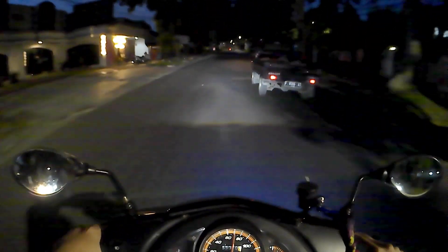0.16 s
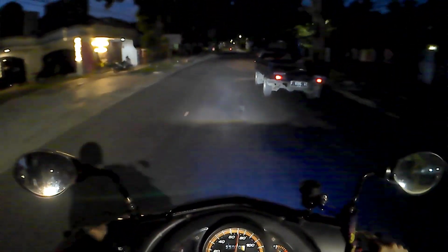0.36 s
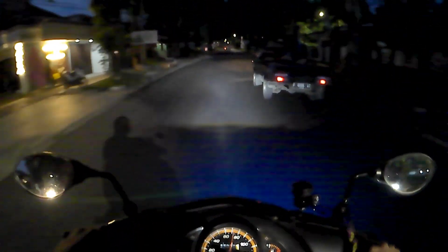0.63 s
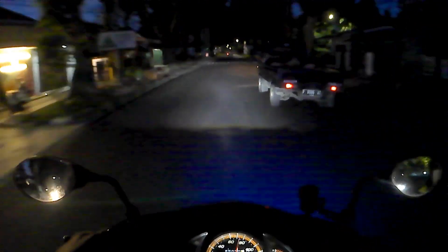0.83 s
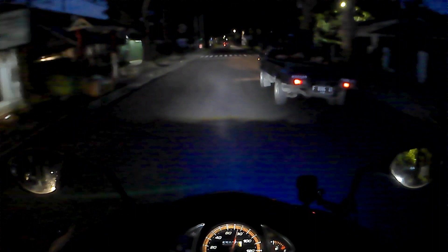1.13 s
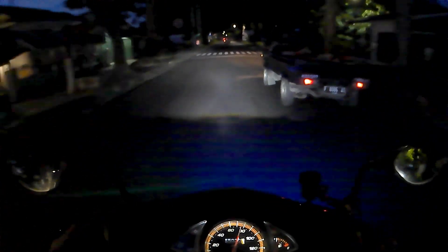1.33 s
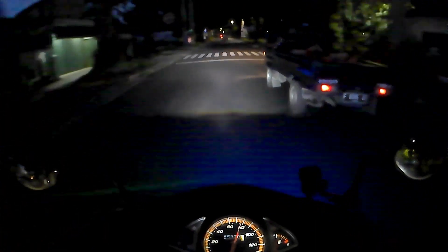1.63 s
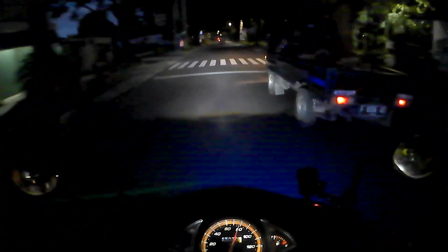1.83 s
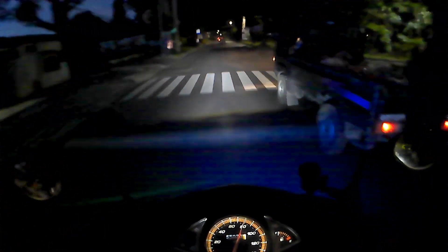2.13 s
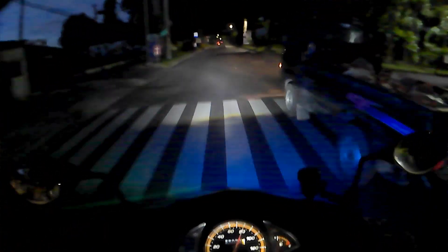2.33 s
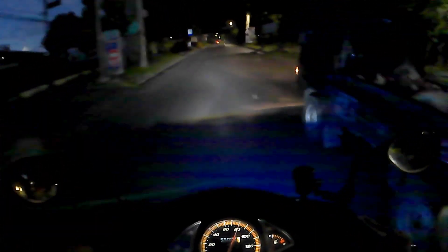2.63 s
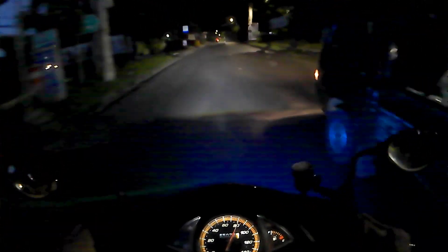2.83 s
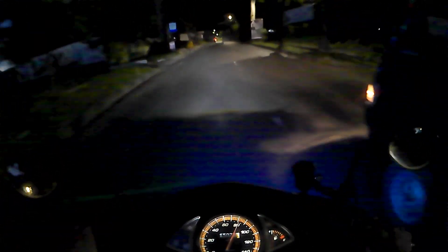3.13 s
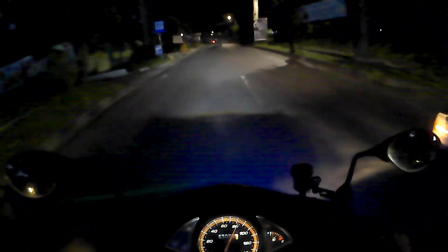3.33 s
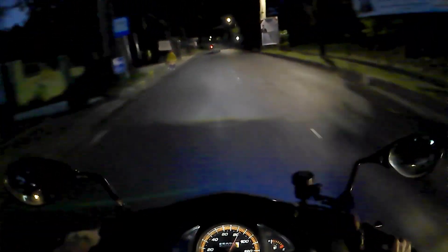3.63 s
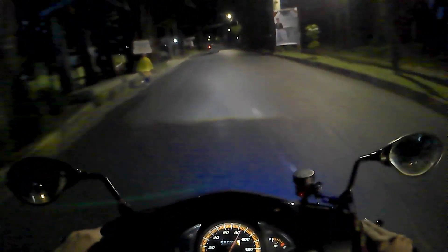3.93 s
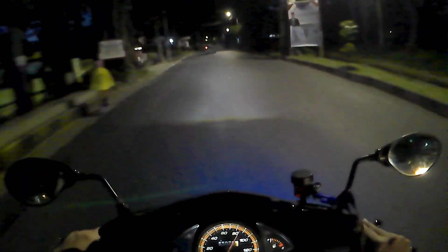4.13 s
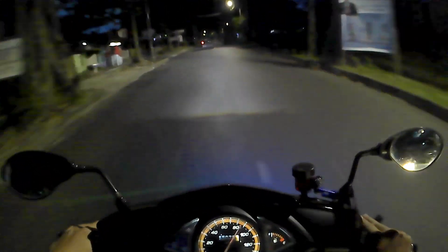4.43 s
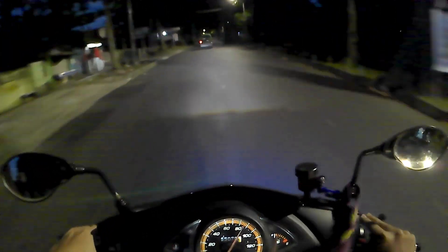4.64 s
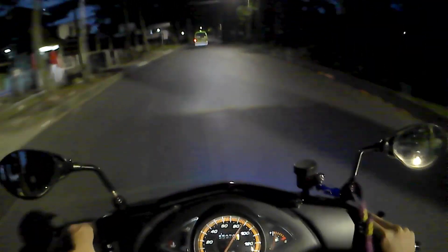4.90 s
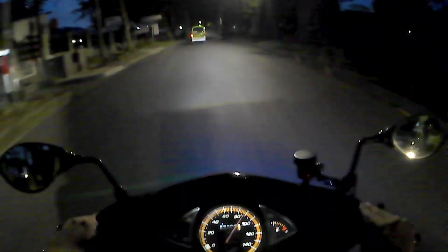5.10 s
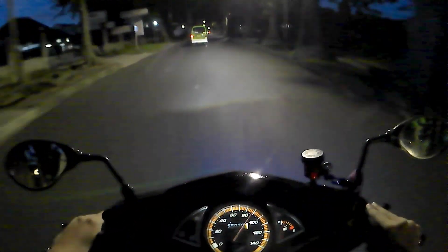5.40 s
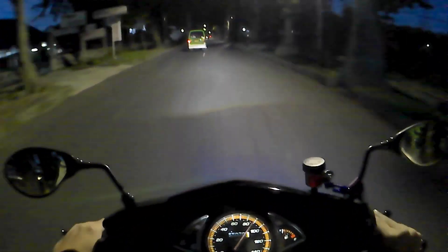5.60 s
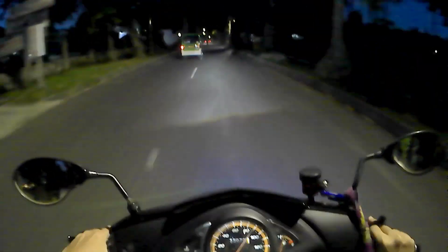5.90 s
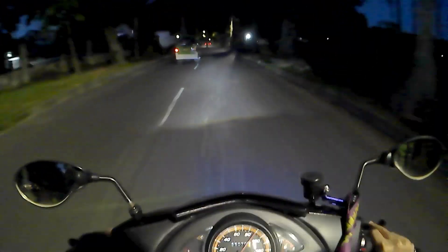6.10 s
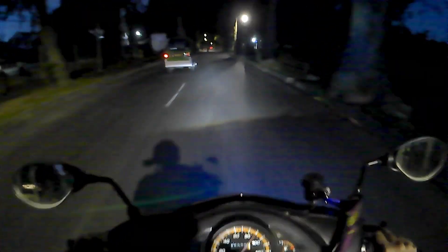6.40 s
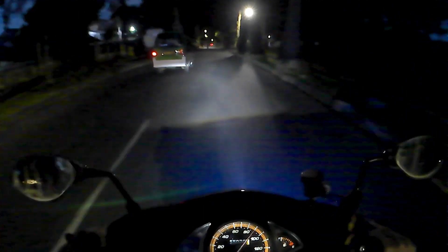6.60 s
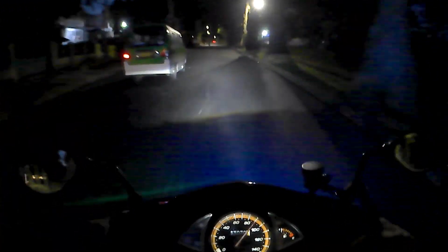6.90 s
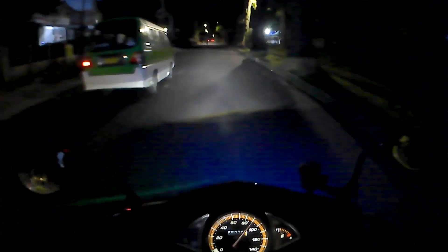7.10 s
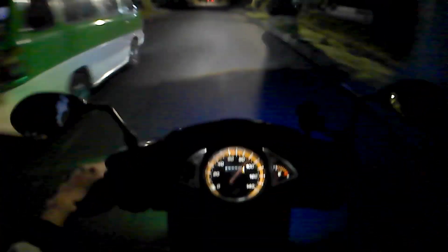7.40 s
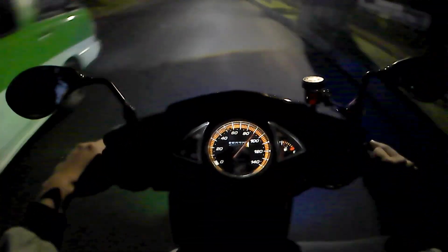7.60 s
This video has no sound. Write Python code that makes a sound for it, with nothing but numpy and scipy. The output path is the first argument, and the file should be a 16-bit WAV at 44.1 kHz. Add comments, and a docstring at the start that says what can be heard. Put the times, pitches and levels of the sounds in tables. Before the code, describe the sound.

Heard from the rider's seat, a small single-cylinder scooter runs continuously at high, nearly steady revs, a raspy buzzing drone. Low wind rumbles and thumps against the microphone in short irregular gusts. Around three seconds a truck is passed and the airy hiss swells for about a second, then settles. The sound is close, outdoors, mono, slightly ringing and compressed, with dull treble.

```python
"""Scooter ride at night

A small single-cylinder scooter runs at nearly steady high revs along a road, heard from the rider's seat.
Each firing sends one pulse through the exhaust, built from multiples of the firing rate.
Filtered noise makes the rest: intake and tyre hiss puffs in step with the engine and swells while a car
is overtaken, and wind buffets the microphone in gusts with a brighter edge."""
import sys
import numpy as np
from scipy import signal
from scipy.fft import rfft, irfft
from scipy.io import wavfile

SR = 44100
rng = np.random.default_rng(int(sys.argv[2]) if len(sys.argv) > 2 else 0)


def voltage_ratio(decibels):
    """Convert decibels (scalar or array-like) to amplitude ratios, 20 dB per decade."""
    exponent = np.asarray(decibels, float) / 20
    return 10 ** exponent


def wrap_up_sound(samples):
    """Save the sound to the file named by the first command line argument, as 16-bit audio."""
    columns = np.atleast_2d(samples).T
    # keep every value between -1 and 1, then stretch to whole-number steps
    tamed = np.clip(columns, -1, 1)
    steps = np.round(tamed * 32767).astype(np.int16)
    wavfile.write(sys.argv[1], SR, steps)


N = 341775   # length in samples
CYCLE = 1024   # points in the stored wave of one firing


def rms_one(x):
    """Scales a signal to an rms (average strength) of 1."""
    return x / np.sqrt(np.mean(x ** 2) + 1e-20)


def in_time(rows):
    """Draws straight lines between table rows; gives each column after the time, sample by sample."""
    seconds, *columns = np.transpose(rows)
    return [np.interp(np.arange(N) / SR, seconds, column) for column in columns]


def drift(rate):
    """Slow random wandering of rms 1 that changes about rate times a second."""
    hop = 40   # samples between the points of the slow noise
    settle = 2000   # points thrown away while the filter settles
    pole = np.exp(-2 * np.pi * rate * hop / SR)
    noise = rng.standard_normal(N // hop + 2 + settle)
    slow = signal.lfilter([1], [1, -2 * pole, pole * pole], noise)[settle:]
    return np.interp(np.arange(N) / hop, np.arange(len(slow)), rms_one(slow))


def coloured(spectrum):
    """Noise of rms 1, filtered to the given spectrum."""
    hz, level_db = np.transpose(spectrum)
    bins = np.fft.rfftfreq(N, 1 / SR) + 1e-3   # keeps the logarithm finite at 0 Hz
    shape_db = np.interp(np.log(bins), np.log(hz), level_db, right=-120)
    white = rng.standard_normal(N)
    return rms_one(irfft(rfft(white) * voltage_ratio(shape_db), N))


def firing_clock():
    """Counts firings by adding up the engine speed; firings come slightly early or late."""
    # Engine speed. Each row: time in seconds, firings per second.
    speed = [(0.0, 69.33), (0.25, 70.63), (0.5, 71.85), (1.0, 73.1), (1.2, 73.2), (2.3, 71.3),
             (2.75, 71.52), (3.25, 72.06), (4.0, 73.7), (4.25, 73.64), (4.75, 73.34), (5.25, 72.63),
             (6.0, 73.25), (6.25, 73.03), (6.7, 72.85), (7.3, 73.75), (7.75, 73.87)]
    return np.cumsum(in_time(speed)[0]) / SR + 0.0015 * drift(20)


def firing_shape():
    """Spectrum of one firing, with the minimum phase of a pulse that rings out through a pipe."""
    # Tone colour of the exhaust. Each row: multiple of the firing rate, relative level in dB.
    exhaust_orders = [(1, -10), (2, 1.5), (3, -1), (4, -6), (5, 2), (6, -14), (7, -1.5), (8, -8),
                      (9, -22.5), (10, -24.5), (11, -18.5), (12, -15.5), (13, -19), (14, -13.5),
                      (15, -17.5), (16, -37.5), (17, -26), (18, -26.5), (19, -18.5), (20, -26.5),
                      (21, -23.5), (22, -31), (23, -26.5), (24, -31), (25, -39.5), (26, -26), (27, -32),
                      (28, -25), (29, -29), (30, -36.5), (31, -34.5), (32, -43), (33, -34.5), (34, -36.5),
                      (35, -38.5), (36, -39.5), (37, -34), (38, -41.5), (39, -35), (40, -47.5), (41, -43),
                      (42, -39), (43, -41), (44, -39), (45, -40.5), (46, -43)]
    order, level_db = np.transpose(exhaust_orders)
    half = CYCLE // 2
    log_gain = np.log(voltage_ratio(np.interp(np.arange(half + 1), np.arange(1, len(order) + 1), level_db)))
    # Folding the cepstrum onto its first half puts the energy as early as possible.
    cepstrum = irfft(log_gain)
    cepstrum[1:half] *= 2
    cepstrum[half + 1:] = 0
    shape = np.exp(rfft(cepstrum))
    shape[0] = 0
    shape[len(order) + 1:] = 0
    return shape / np.sqrt(2 * np.sum(np.abs(shape) ** 2)) * CYCLE   # the wave gets rms 1


def exhaust(firings):
    """Repeats the pulse; throttle and rasp re-weight groups of orders, whose strengths also wander."""
    # Engine load. Each row: time in seconds, exhaust level in dB, throttle in dB, rasp in dB.
    load = [(0.0, -13, -12.5, 6), (0.35, -14.5, -6, 13), (0.95, -14.5, -2.5, 13), (1.3, -14, -1, 6),
            (2.3, -13.5, -2, 3.5), (3.0, -14.5, -0.5, -1), (3.25, -12.5, -4.5, -2), (3.5, -14, 1.5, -0.5),
            (5.0, -13.5, -1, 2), (6.5, -13.5, 0, -1.5), (7.75, -15, 1, -3)]
    # Groups of orders (multiples of the firing rate) that leave the engine by different paths.
    # Each row: first order, last order, lag in firing periods.
    order_groups = [(1, 2, .165), (3, 4, .085), (5, 5, .647), (6, 6, .647), (7, 8, .647), (9, 12, .43),
                    (13, 13, .43), (14, 15, .43), (16, 19, .51), (20, 24, .51), (25, 29, .51),
                    (30, 46, .54)]
    # How each group responds. Each row: share of throttle, share of rasp, unevenness factor.
    group_traits = [(0.084, 0.16, 2), (0.24, 0.048, 0.7), (0.3, 0.034, 1.1), (0.35, 0.006, 1.1),
                    (0.6, -0.077, 0.81), (0.74, -.2, 1.5), (0.4, -1, 1.2), (0.8, 0.17, 2.3),
                    (0.94, 0.0, 1.8), (.5, 0.22, 2.5), (0.91, 0.02, 1.9), (0.63, 0.51, 2)]
    uneven_db = 0.53   # wandering of a group whose unevenness factor is 1
    level_db, throttle_db, rasp_db = in_time(load)
    shape = firing_shape()
    order = np.arange(CYCLE // 2 + 1)
    out = 0
    for (first, last, lag), (lift, raspy, uneven) in zip(order_groups, group_traits):
        in_group = (order >= first) * (order <= last)
        cycle = irfft(shape * in_group, CYCLE)
        position = (firings - lag) % 1 * CYCLE
        wave = np.interp(position, np.arange(CYCLE), cycle, period=CYCLE)
        gain_db = lift * throttle_db + raspy * rasp_db + uneven * uneven_db * drift(33)
        out = out + wave * voltage_ratio(gain_db)
    return voltage_ratio(level_db) * out


def puffs(firings, lag, depth_db):
    """A gain that swells once a firing, lag firing periods after the pulse, by depth_db either way."""
    return rms_one(voltage_ratio(depth_db * np.cos(2 * np.pi * (firings - lag))))


def alongside():
    """0 on the open road, 1 while the car is beside the rider."""
    start_s, rise_s, hold_s, fall_s = 2.99, 0.1, 0.7, 0.3
    corners = start_s + np.cumsum([0, rise_s, hold_s, fall_s])
    return np.interp(np.arange(N) / SR, corners, [0, 1, 1, 0])


def hiss(firings):
    """Air, tyre and valve noise puffs with each firing, the treble a little later; a passed car lifts it."""
    # Main part of the hiss. Each row: frequency in Hz, relative level per Hz in dB.
    body_spectrum = [(500, -4.5), (900, 4.5), (1250, 3.5), (1800, -0.5), (2500, -3.5), (3300, -8),
                     (4200, -13.5), (5500, -36)]
    # Upper part of the hiss. Each row: frequency in Hz, relative level per Hz in dB.
    treble_spectrum = [(2800, -19.5), (4000, 0.5), (5000, -1.5), (6000, -5), (7000, -11.5), (7400, -28)]
    car = alongside()
    level_db = -35 + 2.5 * car + 0.76 * drift(24)
    sag_db_per_s = 0.27   # the treble slowly fades
    treble_db = -14.5 - sag_db_per_s * np.arange(N) / SR + 3.5 * car   # on top of level_db
    body = coloured(body_spectrum) * puffs(firings, lag=0.62, depth_db=1.0)
    body = body * voltage_ratio(0.4 * drift(5.2))   # slight flicker
    treble = coloured(treble_spectrum) * puffs(firings, lag=0.79, depth_db=2.0)
    return voltage_ratio(level_db) * (body + treble * voltage_ratio(treble_db))


def gusts():
    """Every gust swells and fades as the same bell curve, in dB."""
    # Gusts; a negative rise is a dip. Each row: time of the middle in seconds, rise of the buffeting in dB,
    # rise of the bright edge in dB.
    gust_rows = [(0.08, 2.5, 6), (0.28, 0, 3), (0.551, 2.5, -1.5), (0.75, 4.5, 5), (1.13, 3.5, 3.5),
                 (1.54, -3, 1), (2.0, 10, 15), (2.16, 4.5, 5), (2.28, 3.5, 2), (2.54, 5, 7),
                 (2.781, 2.5, 4), (2.96, 6, 9.5), (3.13, 6.5, 10.5), (3.66, 5, 6.5), (3.88, 4.5, 5.5),
                 (4.101, 4, 4), (4.471, 5.5, 10), (4.679, 6.5, 0), (4.96, 4.5, 4), (5.22, 2, -5),
                 (5.431, 8, 9), (5.75, 5, 2), (6.03, 3.5, 1), (6.301, 7.5, 3), (6.749, 2, 4),
                 (7.02, 1.5, 8), (7.349, 2, 5), (7.639, 3.5, 9)]
    spread_s = 0.035   # standard deviation of the bell
    middle_s, *rises_db = np.transpose(gust_rows)
    steps = np.arange(0, N, 100) / SR
    bells = np.exp(-0.5 * ((steps[:, None] - middle_s) / spread_s) ** 2)
    return [np.interp(np.arange(N) / SR, steps, bells @ rise_db) for rise_db in rises_db]


def wind():
    """Low buffeting noise on the microphone, and the brighter edge that sharp gusts carry."""
    # Steady wind. Each row: time in seconds, buffeting level in dB.
    steady_wind = [(0.0, -20), (1.8, -23.5), (2.3, -20), (4.0, -20.5), (6.5, -19), (7.75, -16.5)]
    # Low rumble of the wind. Each row: frequency in Hz, relative level per Hz in dB.
    buffet_spectrum = [(20, -10.5), (38, -20.5), (60, -7.5), (100, -0.5), (250, -1), (370, -2), (470, -11),
                       (700, -23.5), (1200, -42)]
    # Brighter wind noise. Each row: frequency in Hz, relative level per Hz in dB.
    edge_spectrum = [(300, -27), (450, -11), (600, 1.5), (800, -5), (1000, -4), (1300, -19), (2000, -42)]
    buffet_rise_db, edge_rise_db = gusts()
    buffet_db = in_time(steady_wind)[0] + buffet_rise_db + 0.97 * drift(13)
    edge_db = -37 + edge_rise_db + 0.57 * drift(23)   # -37 dB between gusts
    return voltage_ratio(buffet_db) * coloured(buffet_spectrum) + voltage_ratio(edge_db) * coloured(edge_spectrum)


def ringing_bands(x):
    """Peak filters make evenly spaced narrow bands stand out, whatever sound passes."""
    # Boost of each band in dB, from 1.5 spacings upward, one spacing apart.
    band_lift_db = [5.65, 2.5, 4.7, 10.1, 7, 7, 7, 9, 8.9, 15]
    spacing_hz, width_hz = 689, 62
    damping = np.pi * width_hz / SR
    for k, lift_db in enumerate(band_lift_db):
        w = 2 * np.pi * (k + 1.5) * spacing_hz / SR
        gain = voltage_ratio(lift_db / 2)   # used above and below the line, so the peak gets the whole lift
        top = [1 + damping * gain, -2 * np.cos(w), 1 - damping * gain]
        bottom = [1 + damping / gain, -2 * np.cos(w), 1 - damping / gain]
        x = signal.lfilter(top, bottom, x)
    return x


def limiter(x, ceiling_db, release_db_per_s, attack_s):
    """Peaks over the ceiling pull the gain down; it recovers at a steady rate, smoothed by the attack."""
    ramp = release_db_per_s * np.arange(N) / SR
    over_db = np.maximum(20 * np.log10(np.abs(x) + 1e-9) - ceiling_db, 0)
    # With the ramp added, a running maximum falls back at the release rate.
    held_db = np.maximum.accumulate(over_db + ramp, axis=-1) - ramp
    pole = np.exp(-1 / (attack_s * SR))
    return x * voltage_ratio(-signal.lfilter([1 - pole], [1, -pole], held_db))


def scene():
    """Engine, hiss and wind add up at one microphone."""
    firings = firing_clock()
    return (exhaust(firings) + hiss(firings) + wind())[None]


def low_pass(x):
    """Removes everything above the highest recorded frequency."""
    return signal.sosfilt(signal.butter(12, 7740, fs=SR, output="sos"), x)


def record(dry):
    """Narrow bands ring, a limiter tames the level, and a soft curve rounds the peaks."""
    ringing = ringing_bands(dry)
    limited = limiter(ringing, ceiling_db=-4.0, release_db_per_s=62.5, attack_s=0.0086)
    mix = 0.96 * np.tanh(limited / 0.95)
    return low_pass(mix)


dry = scene()
out = record(dry)
wrap_up_sound(out)
```